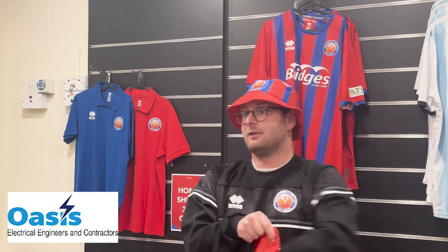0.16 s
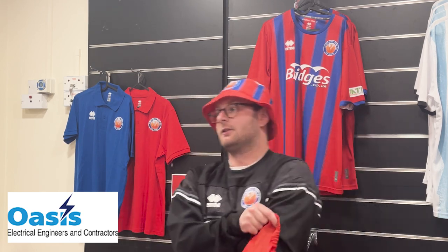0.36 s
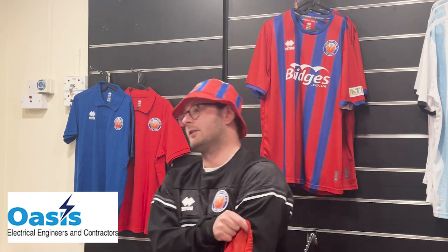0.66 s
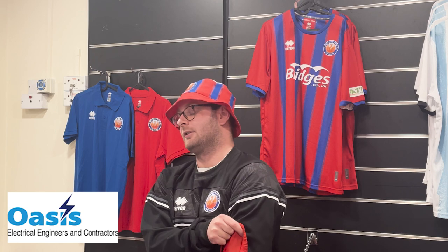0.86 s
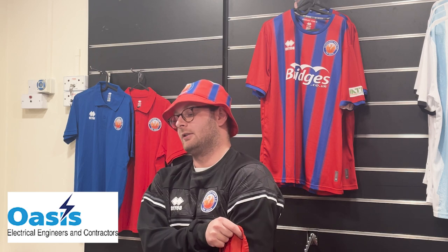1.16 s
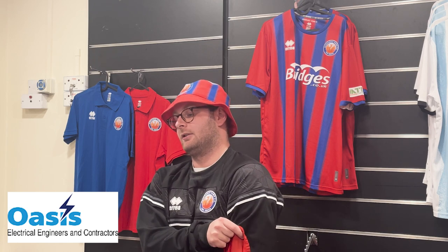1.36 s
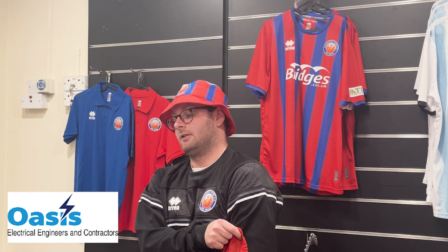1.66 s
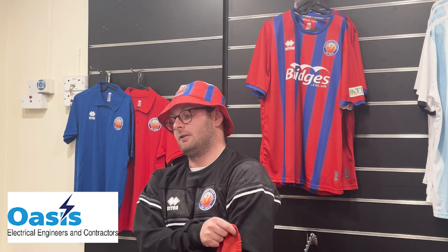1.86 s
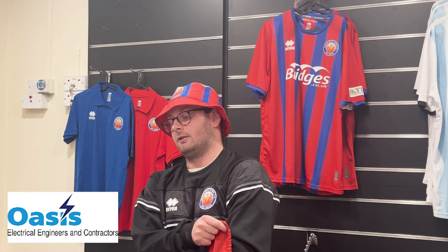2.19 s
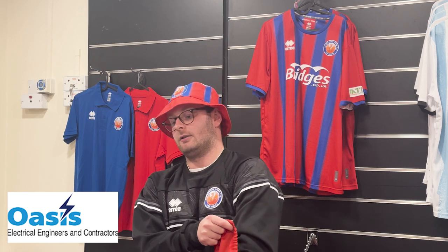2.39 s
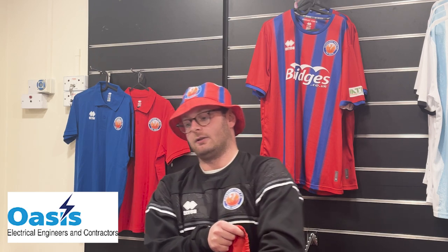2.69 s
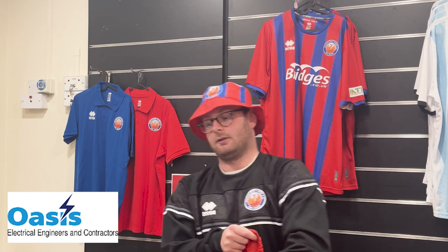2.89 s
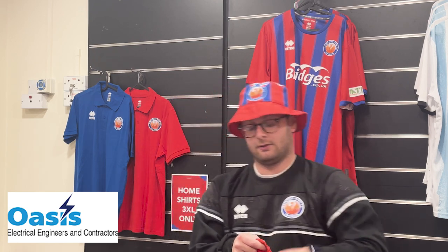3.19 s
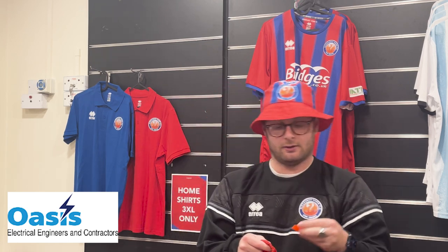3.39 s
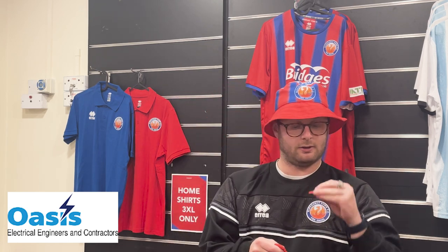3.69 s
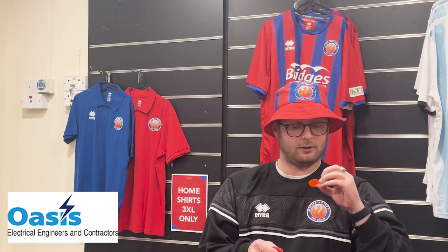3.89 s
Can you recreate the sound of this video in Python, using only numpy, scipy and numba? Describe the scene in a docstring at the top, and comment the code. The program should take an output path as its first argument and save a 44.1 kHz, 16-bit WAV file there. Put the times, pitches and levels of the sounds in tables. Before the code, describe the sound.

A soft bump and cloth rustle, then thin plastic discs rattle and click in a fabric bag, thinning to a few crisp knocks over low rumble.

```python
"""A soft bump and a cloth rustle open: a hand stirs thin hard plastic discs in a cloth bag, a metre away.
The discs rattle and click: decaying plate modes with a noisy crack; cloth and bag bulk are shaped noise.
After the stirring, single drags brush over the cloth. A small shop room answers with decaying noise.
Traffic rumble and narrow hums (filtered noise), a wavering engine and a lower drone (sines) come through
the walls. Two ports of a phone hear it all."""
import sys
import numpy as np
from scipy import signal
from scipy.fft import rfft, irfft
from scipy.io import wavfile
from scipy.ndimage import uniform_filter1d
from numba import njit

SR = 44100
rng = np.random.default_rng(int(sys.argv[2]) if len(sys.argv) > 2 else 0)


def wrap_up_sound(samples):
    """Save the sound to the file named by the first command line argument, as 16-bit audio."""
    columns = np.atleast_2d(samples).T
    # keep every value between -1 and 1, then stretch to whole-number steps
    tamed = np.clip(columns, -1, 1)
    steps = np.round(tamed * 32767).astype(np.int16)
    wavfile.write(sys.argv[1], SR, steps)


N = 178516


def undb(db):
    """Turns decibels into an amplitude factor."""
    return 10 ** (np.asarray(db) / 20)


def level(x, db):
    """Scales a sound to an RMS level in dB."""
    return x * undb(db) / np.sqrt(np.mean(x ** 2))


def at_hz(table, hz):
    """Reads (Hz, value) rows on a log frequency axis."""
    f, v = np.transpose(table)
    return np.interp(np.log(hz + 1), np.log(f + 1), v)


def in_time(table):
    """Draws straight lines through (s, value, ...) rows, one curve per column."""
    s, *columns = np.transpose(table)
    return [np.interp(np.arange(N) / SR, s, column) for column in columns]


def colour(x, table):
    """Filters by (Hz, dB) rows."""
    size = x.shape[-1]
    gain = undb(at_hz(table, np.fft.rfftfreq(size, 1 / SR)))
    return irfft(rfft(x) * gain, size)


def octave_share(f, hz):
    """Weight of one octave band, fading linearly to nothing an octave away on either side."""
    return np.clip(1 - abs(np.log2(f + 1) - np.log2(hz)), 0, 1)


def walk(rate):
    """Random levels held 1 / rate s and slewed twice; spread near 1.5."""
    k = int(SR / rate)
    held = np.repeat(rng.standard_normal(N // k + 1), k)
    return 2.0 * uniform_filter1d(uniform_filter1d(held, k), k)[:N]


def swell(middle_s, half_s):
    """A smooth rise and fall, half as strong at half the half length."""
    return np.exp(-2.8 * ((np.arange(N) / SR - middle_s) / half_s) ** 2)


# the stirring hand's vigour, as disc rattle: time_s, vigour_db
STIR_VIGOUR = [(0, -38), (.05, -76), (.09, -44), (.14, -43.5), (.37, -26), (.46, -34.5), (.58, -32.5),
               (.6, -28), (.75, -38.5), (.81, -29), (.85, -39.5), (.89, -29.5), (.97, -46), (1.05, -35.5),
               (1.1, -25), (1.13, -29.5), (1.29, -31), (1.32, -26), (1.38, -32), (1.42, -27), (1.5, -31),
               (1.54, -29), (1.57, -45), (1.72, -47.5), (1.77, -63), (1.88, -45), (1.92, -61), (1.97, -55),
               (2.12, -68)]
# fingers drag over the cloth while picking a disc: start_s, hold_s, cloth_db, loose_discs_against_cloth_db
FINGER_DRAGS = [(2.15, 0.076, -57, 10.5), (2.42, 0.21, -77, -2), (2.64, .1, -57.5, -1),
                (2.992, 0.075, -58.5, -18.5), (3.113, 0.19, -62.5, -2.5)]
DRAG_ATTACK_S, DRAG_RELEASE_DB_S, REST_DB = 0.033, 151, -84.5
HEAP_UNTIL_S = 2.1  # until then the discs are buried in the heap and ring shorter
# at a vigour of -30 dB, and how closely each follows the vigour (dB per dB)
RUSTLE_DB, RUSTLE_PER_DB = -47, 0.53
THUMP_DB, THUMP_PER_DB, THUMP_FADE_DB_S = -45, .5, 11.5  # weaker as the hands settle
GATHER_DB, GATHER_FADE_DB_S = -50.5, 14  # the cloth being gathered up at first
LIFT_DB, LIFT_FADE_DB_S = -38, 296  # the bump as the bag is picked up


def hand():
    """Drive in dB for rattle, rustle and thump: stirring first, then drags that rise, hold and die away."""
    t = np.arange(N) / SR
    vigour, = in_time(STIR_VIGOUR + [(2.2, -120)])
    above = vigour + 30
    rattle_gain = undb(vigour)
    rustle_gain = undb(RUSTLE_DB + RUSTLE_PER_DB * above) * (t < HEAP_UNTIL_S)
    rustle_gain = rustle_gain + undb(GATHER_DB - GATHER_FADE_DB_S * t) + undb(REST_DB)
    for start, hold, db, discs_db in FINGER_DRAGS:
        attack = np.clip((t - start) / DRAG_ATTACK_S, 0, 1)
        drag = attack * undb(db - DRAG_RELEASE_DB_S * np.clip(t - start - hold, 0, None))
        rattle_gain = rattle_gain + undb(discs_db) * drag
        rustle_gain = rustle_gain + drag
    thump_gain = undb(THUMP_DB + THUMP_PER_DB * above - THUMP_FADE_DB_S * t)
    thump_gain = thump_gain + undb(LIFT_DB - LIFT_FADE_DB_S * t)
    return 20 * np.log10(np.array([rattle_gain, rustle_gain, thump_gain]) + 1e-6)


def thump(bump_db):
    """The bag's bulk moves air dully: low band-passed noise."""
    band = signal.butter(2, [170, 480], "bandpass", fs=SR, output="sos")
    return level(signal.sosfilt(band, rng.standard_normal(N)), -1.5) * undb(bump_db)


# tone of the cloth hiss: pitch_hz, level_db
CLOTH_TONE = [(200, -5.5), (500, -2.5), (1500, 0), (3000, -1), (6000, -8.5), (10000, -6.5), (15500, -14)]


def cloth(rustle_db):
    """Fibres drag over skin and discs: hiss made grainy by slow and fast level walks."""
    grain = undb(2.5 * walk(29.97) + 1.7 * walk(250))
    hiss = colour(grain * rng.standard_normal(N), CLOTH_TONE)
    return level(hiss, 3.2) * undb(rustle_db)


@njit
def add(out, start, hz, gain, t60):
    """Lets each decaying mode ring from its start until it has fallen by 60 dB."""
    for e in range(len(start)):
        for m in range(hz.shape[1]):
            turn = np.exp(2j * np.pi * hz[e, m] / SR - np.log(1000) / (t60[e, m] * SR))
            z = gain[e, m] + 0j
            for i in range(start[e], min(len(out), start[e] + int(t60[e, m] * SR))):
                out[i] += z.imag
                z *= turn


# plate modes of a disc, before damping: multiple_of_pitch, level_db, t60_s
DISC_MODES = [(.568, -31, 0.066), (0.986, -18.5, 0.074), (1, -2.5, .12), (2.08, -14.5, 0.055),
              (2.2, -12, 0.17), (2.471, -10, 0.038), (3.7, -7, 0.045), (4.07, -11.5, 0.04)]
# tone of the contact noise: pitch_hz, level_db
CRACK_TONE = [(700, -46), (1500, -33), (2000, -4.5), (2700, -5.5), (3500, -1), (6000, -0.5), (10000, 2),
              (12000, -9), (13500, -2), (15500, -3)]


def discs(s, db, hz, crack_db, crack_ms, others_db, damping, snap=0.68):
    """Each contact rings one disc's modes, struck at a chance spot, with a sharp snap and a short scrape."""
    multiple, mode_db, t60 = np.transpose(DISC_MODES)
    chance = rng.standard_normal((len(s), 2, len(DISC_MODES)))
    start = (s * SR).astype(int)
    ring, scrape, snaps = np.zeros(N), np.zeros(N), np.zeros(N)
    other = abs(multiple - 1) > .01  # every mode but the main one
    detune = 1 + .005 * chance[:, 0] * other
    modes_hz = np.clip(hz[:, None] * multiple * detune, 0, .45 * SR)
    spot_db = (2.5 * chance[:, 1] + others_db[:, None]) * other
    modes_db = db[:, None] - 9 + mode_db + spot_db
    add(ring, start, modes_hz, undb(modes_db), t60 * damping * np.ones_like(modes_hz))
    for i, gain, ms in zip(start, undb(db + crack_db - 5.5), crack_ms):
        length = min(int(ms * SR / 150), N - i)
        fade = np.exp(-np.arange(length) / (ms * SR / 1000))
        scrape[i:i + length] += gain * fade
        snaps[i] += snap * gain
    return ring + colour(snaps + scrape * rng.standard_normal(N), CRACK_TONE)


def rattle(stir_db, per_s=520, scatter_db=2.5, until_s=3.6):
    """The heap of discs tumbles: many small contacts, damped by neighbours and cloth."""
    chance = rng.random((int(per_s * until_s), 4)).T
    s = chance[0] * until_s
    # a few contacts are much harder than the rest
    db = stir_db[(s * SR).astype(int)] - 5.5 - scatter_db * np.log(chance[1] + 1e-2)
    hz = 3150 + 1000 * chance[2]
    crack_db = 4 + 6 * chance[3]
    even = np.ones(len(s))
    return discs(s, db, hz, crack_db, 1.54 * even, -1.5 * even, damping=0.72)


# traffic spectrum, relative power density: pitch_hz, level_db
STREET_TONE = [(15, -68), (25, -38.5), (32, -35), (35, -30), (46, -7.5), (69, -9.5), (93, -9.5),
               (164, -12.5), (267, -18), (368, -26.5), (648, -32), (782, -28.5), (1300, -35.5), (2920, -61),
               (15500, -84.5)]
# how much differs between the ports: pitch_hz, side_minus_mid_db
STREET_WIDTH = [(60, -12.5), (110, -18), (200, -10), (380, -6), (700, -1), (1290, 0.5), (2380, 1),
                (4400, -11.5), (8120, -5.5), (15000, -5.5)]
STREET_DB = -41  # RMS before the late swell and the port balance
STREET_SWELL_DB, STREET_SWELL_S, STREET_SWELL_HALF_S = 1, 3.9, .6  # grows a little towards the end


def street():
    """Traffic noise in octave bands that each waver a little; most alike at both ports in the bass."""
    f, out = np.fft.rfftfreq(N, 1 / SR), 0
    mid, side = rfft(rng.standard_normal((2, N))) * undb(at_hz(STREET_TONE, f))
    pair = mid + side * undb(at_hz(STREET_WIDTH, f)) * np.array([[1], [-1]])
    for hz in 32 * 2. ** np.arange(10):
        out = out + irfft(pair * octave_share(f, hz), N) * undb(1.3 * walk(3))
    growth = undb(STREET_SWELL_DB * swell(STREET_SWELL_S, STREET_SWELL_HALF_S))
    return level(out, STREET_DB) * growth


# low room resonances, level before the port balance: pitch_hz, width_hz, level_db
HUM_RESONANCES = [(52.3, 2.6, -48.5), (99.9, 5.7, -46)]


def hum():
    """Narrow low resonances fed with noise, so they swell by chance."""
    f, out = np.fft.rfftfreq(N, 1 / SR), 0
    for hz, width, db in HUM_RESONANCES:
        resonance = 1 / (1 + (2 * (f - hz) / width) ** 2)
        out = out + level(irfft(rfft(rng.standard_normal(N)) * resonance, N), db)
    return out


# firing rate of the engine outside: time_s, rate_hz
FIRING_RATE = [(0, 63.87), (.5, 64), (.7, 65.65), (2.3, 65.6), (2.7, 63.62), (3.1, 64.7), (3.27, 68.35),
               (3.7, 68.3), (4.05, 66)]
# its lowest order wavers and nearly vanishes at times: time_s, level_db
LOWEST_ORDER = [(0, -25.5), (.2, -30.5), (.45, -35.5), (.57, -54), (.7, -32.5), (.9, -40.5), (1.2, -47),
                (1.37, -34.5), (1.74, -29), (1.84, -44), (1.95, -30.5), (2.33, -34.5), (2.43, -50),
                (2.55, -39.5), (2.74, -58), (2.88, -31), (3.08, -32), (3.19, -43.5), (3.3, -29.5),
                (3.45, -34), (3.6, -25.5), (3.7, -50), (3.8, -31), (3.9, -33), (4.05, -52)]
# its higher orders swell now and then: order, middle_s, half_length_s, level_db
HIGHER_ORDERS = [(2, 0.66, 0.17, -44), (2, 1.307, 0.4, -39.5), (2, 1.75, 0.36, -34.5), (2, 2.104, 0.3, -43),
                 (2, 3.39, 0.46, -47.5), (3, 1.928, 0.14, -44), (3, 2.1, .2, -45), (3, 3.04, .15, -44)]


def engine():
    """Three orders of one firing rate that swell and fade through the walls."""
    hz, = in_time(FIRING_RATE)
    phase = 2 * np.pi * np.cumsum(hz) / SR
    s, db = np.transpose(LOWEST_ORDER)
    tone = np.interp(np.arange(N) / SR, s, undb(db)) * np.sin(phase)
    for order, middle, half, db in HIGHER_ORDERS:
        tone = tone + undb(db) * swell(middle, half) * np.sin(round(order) * phase)
    return np.sqrt(2) * tone  # peak from RMS


# clear single clicks; crack_fade_ms is a fall to 1/e, others_db is low when one mode rings alone:
# start_s, ring_db, pitch_hz, crack_against_ring_db, crack_fade_ms, others_db
CLEAR_CLICKS = [(.0877, -21, 3610, 1, 1.7, -4), (.184, -26.5, 3680, 3, 2.3, -7),
                (.2543, -17.5, 3700, 0, 1.5, -2), (.3072, -20.5, 3640, 2, 2.5, 12),
                (.4798, -24.5, 3670, 10, 3.8, -5), (.5065, -17, 2080, -19, 2.3, -28),
                (.5078, -19, 3650, 6, 5, 5.5), (.5886, -18.5, 3630, -2, 3.4, 9.5),
                (.6200, -17.5, 3476, -11, 2, -8), (.8036, -15, 3670, -19, 2.6, -1),
                (.8769, -22.5, 3518, -0.5, 5.5, 0), (.9956, -30, 3730, 5, 2.2, -7),
                (1.0056, -23, 3550, 5, 4.2, 2), (1.0755, -25, 3820, 5, 10, -6),
                (1.0984, -23.5, 3620, 9, 6, 9), (1.1164, -16, 3603, 3, 1.7, 7),
                (1.1393, -15, 3856, -7.5, 1.84, 1), (1.1754, -20, 3820, -10, 2.2, 2),
                (1.288, -25, 3580, -23, 1.9, -19), (1.309, -13.5, 3890, -13, 5.1, -8),
                (1.3573, -25.5, 3460, 11, 2.4, -13), (1.4391, -15, 3664, -3, 0.48, -5),
                (1.512, -12, 3536, -15, 2, -4), (1.5295, -5.5, 4183, -19, 2, -36),
                (1.6152, -20.5, 3770, 6, 2.3, -9), (1.6566, -18.5, 4147, -1.5, 2.1, -4),
                (1.7095, -23.5, 3680, 2.5, 1.1, -8), (1.8322, -38, 3603, 5, 1.5, 10),
                (1.8816, -31.5, 3690, 15.5, 1.07, -8), (1.9355, -34, 3580, 15, 0.95, -10),
                (1.9535, -27, 3477, 4.5, 1.5, 0), (1.9644, -51, 3300, 32, .9, -5),
                (1.985, -40.5, 3520, 17.5, 2.2, -7), (1.9964, -49, 3580, 26, 2.4, 1),
                (2.1545, -24, 3600, 10.5, 5.3, 15.5), (2.1784, -22, 3480, 4, 1.45, 13.5),
                (2.1924, -28.5, 3610, 11, 3.2, 9), (2.2154, -15.5, 3542, 6, 0.95, -8),
                (2.2594, -22.5, 3576, 0, 1.7, -6), (2.3411, -33.5, 3494, 27.5, 0.23, -5.5),
                (2.6189, -24.5, 3510, -6.5, .87, -3.5), (2.6454, -6.5, 3464, 4, 1.3, -16),
                (2.6984, -22.5, 3740, 4.5, 3, 6), (2.7000, -29, 2030, -23, 1.5, -27.5),
                (2.7134, -23, 3710, -2.5, 1.2, -1.5), (3.0640, -52.5, 2680, 23.5, .8, -13),
                (3.1588, -20.5, 3646, 10.5, 3, 14), (3.1640, -15, 2098, -23.5, 1.5, -26.5),
                (3.1662, -4.5, 3692, -4, 1.9, 3.5), (3.1695, -14, 3755, 13.5, 1.35, 5.5),
                (3.1755, -16, 3640, 4, 1.1, 11.5), (3.2889, -24, 3652, -3, 1.4, -.5),
                (3.29, -39.5, 4900, -6, 1.4, -25), (3.5663, -55.5, 3250, 10.5, 1.4, -9)]


def clicks():
    """Single discs knock together and ring, damped more while buried in the heap."""
    s, db, hz, crack_db, crack_ms, others_db = np.transpose(CLEAR_CLICKS)
    damping = np.where(s < HEAP_UNTIL_S, .6, .9)[:, None]
    return discs(s, db, hz, crack_db, crack_ms, others_db, damping)


# reverberation time: pitch_hz, t60_s
ROOM_DECAY = [(500, 0.3), (3500, 0.33), (8000, 0.19), (15000, 0.2)]
ROOM_DB = -2


def room(x):
    """Two decaying noise responses, with a decay that depends on pitch: one to share, one to differ."""
    t = np.arange(int(.6 * SR)) / SR
    f = np.fft.rfftfreq(len(t), 1 / SR)
    tail = 0
    for hz in 250 * 2. ** np.arange(7):
        noise = rfft(rng.standard_normal((2, len(t))))
        band = irfft(noise * np.sqrt(octave_share(f, hz)), len(t))
        tail = tail + band * np.exp(-np.log(1000) * t / at_hz(ROOM_DECAY, hz))
    tail = tail * (t > .003) / np.sqrt(np.sum(tail[0] ** 2))  # silent for the first 3 ms
    return undb(ROOM_DB) * signal.fftconvolve(x[None], tail, axes=1)[:, :N]


# phase step between the two ports: pitch_hz, phase_radians
PORT_STEP = [(0, 0), (2500, .4), (5170, .6), (6800, -1), (7670, -2.6), (8200, -3.14), (8870, -3.7),
             (10900, -6), (12300, -6.5), (13100, -7.7), (14500, -9.2), (15300, -9.5)]
# level step between the two ports: pitch_hz, left_minus_right_db
PORT_LEVELS = [(60, 4), (110, 8), (200, -0.5), (380, 5), (700, 1.5), (1290, 1.5), (2380, 1.5), (4400, 4.5),
               (8120, 1), (15000, -0.5)]


def ports(x):
    """The two microphone ports hear the same sound with a phase and level step that depends on pitch."""
    f = np.fft.rfftfreq(N, 1 / SR)
    hz, radians = np.transpose(PORT_STEP)
    # each port takes half of the step
    half = np.sqrt(undb(at_hz(PORT_LEVELS, f))) * np.exp(.5j * np.interp(f, hz, radians))
    return irfft(rfft(x) * np.array([half, 1 / half]), N)


# a second, lower motor; its level is the fundamental's RMS at the peak, before the port balance
DRONE_HZ, DRONE_DB, DRONE_OCTAVE_DB = 55.2, -36.5, -8.5
DRONE_PEAK_S, DRONE_HALF_S, DRONE_RADIANS = 2.9, 0.83, 2.2  # phase at 3 s


def drone():
    """A low tone of fixed pitch and its octave, swelling once."""
    phase = 2 * np.pi * DRONE_HZ * (np.arange(N) / SR - 3) + DRONE_RADIANS
    tone = np.sin(phase) + undb(DRONE_OCTAVE_DB) * np.sin(2 * phase)
    return np.sqrt(2) * undb(DRONE_DB) * swell(DRONE_PEAK_S, DRONE_HALF_S) * tone


# the part of the room that differs between ports: pitch_hz, level_db
ROOM_DIFFERENCE = [(500, -5), (1500, -2), (3500, -6.5), (8000, -3.5), (15000, -15.5)]


def scene():
    """Mixes the bag with its room, and adds the sounds from outside, a little stronger on the left."""
    stir_db, rustle_db, bump_db = hand()
    bag = thump(bump_db) + cloth(rustle_db) + rattle(stir_db) + clicks()
    common, apart = room(bag)
    near = ports(bag + common) + colour(apart, ROOM_DIFFERENCE) * np.array([[1], [-1]])
    motors = (engine() + drone() + hum()) * undb([[2.1], [-2.1]])
    traffic = street() * undb([[.8], [-.8]])
    return near + motors + traffic


TOP_HZ = 15700


def record(dry):
    """The phone cuts the top steeply: an elliptic low-pass."""
    return signal.sosfilt(signal.ellip(8, .2, 70, TOP_HZ, fs=SR, output="sos"), dry)


dry = scene()
out = record(dry)
wrap_up_sound(out)
```